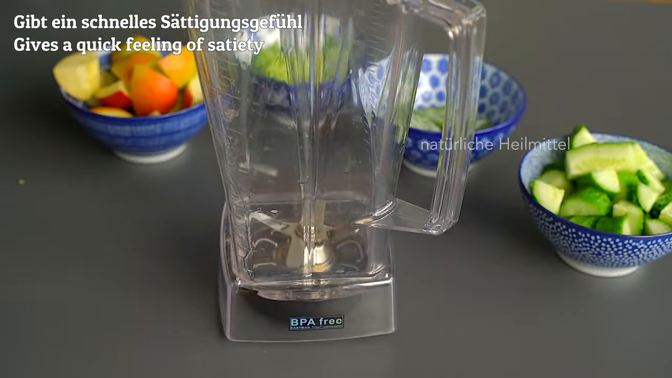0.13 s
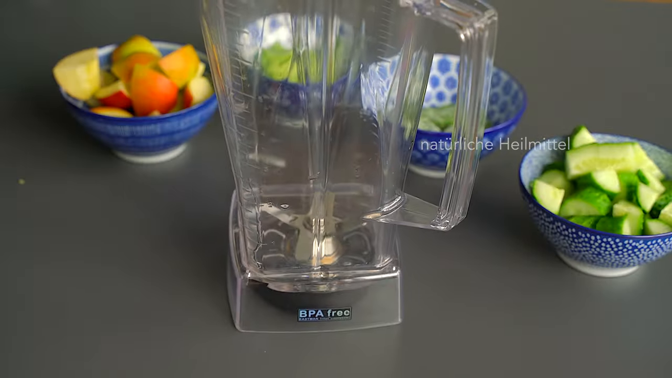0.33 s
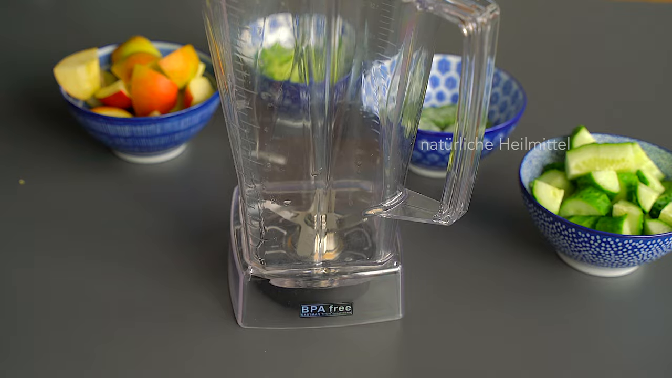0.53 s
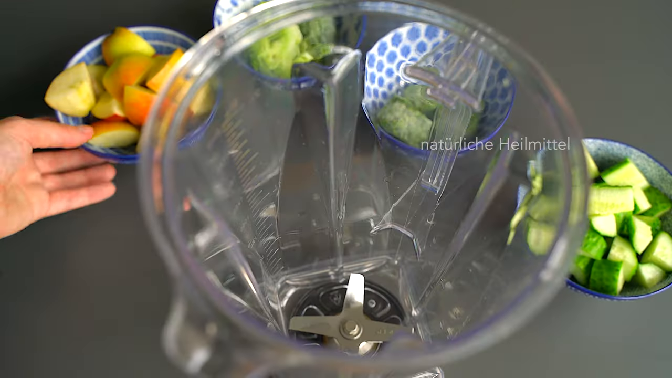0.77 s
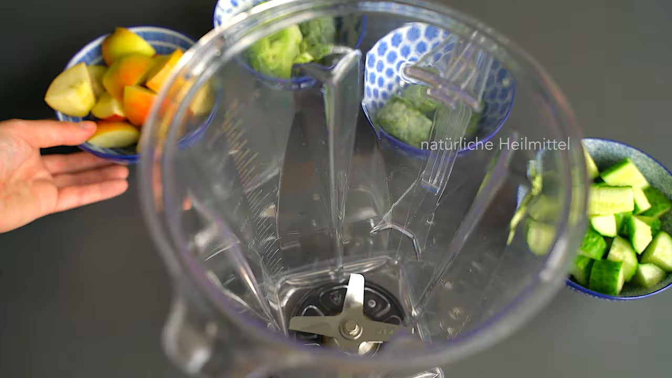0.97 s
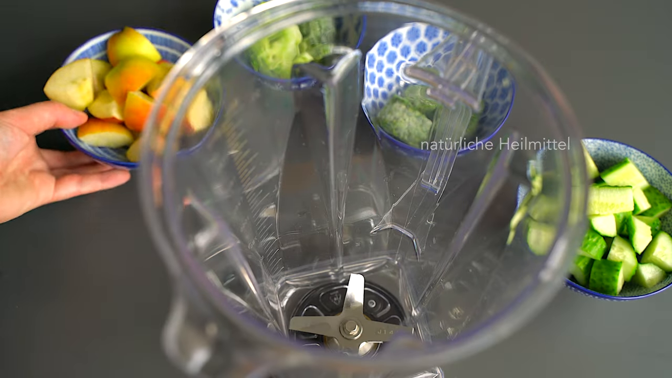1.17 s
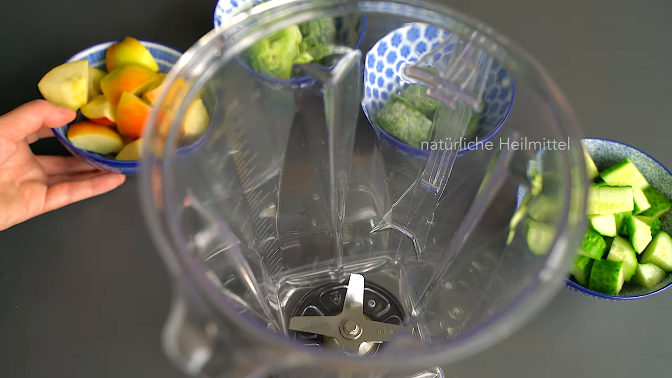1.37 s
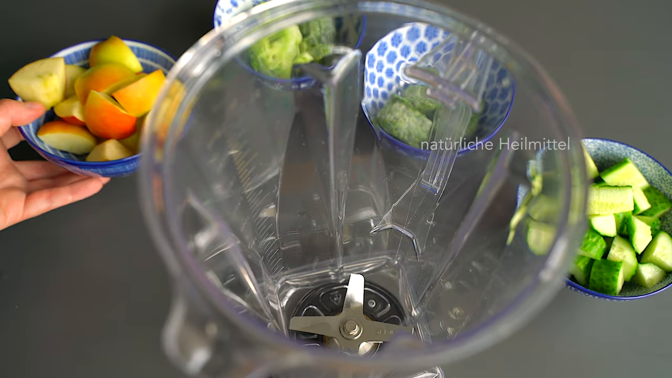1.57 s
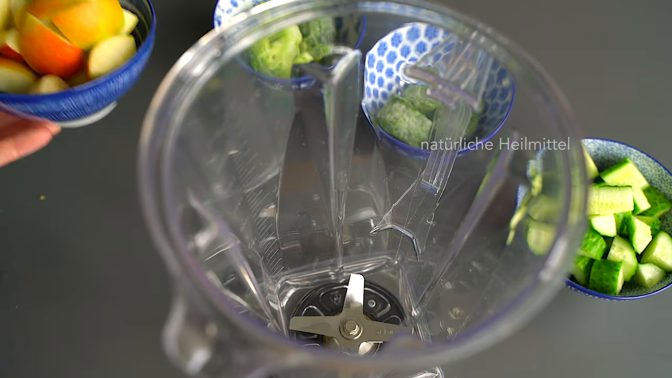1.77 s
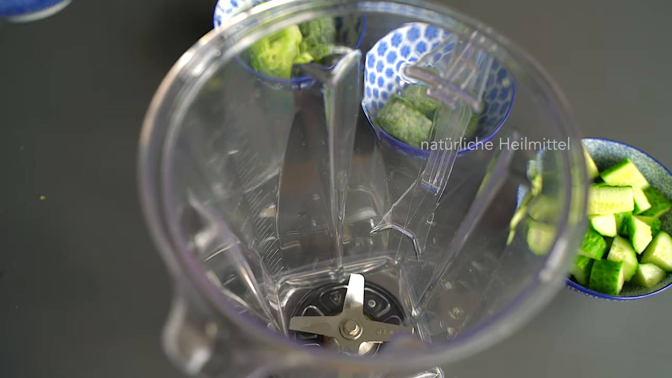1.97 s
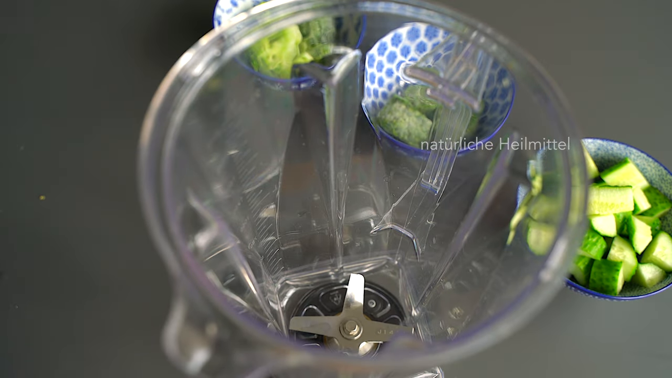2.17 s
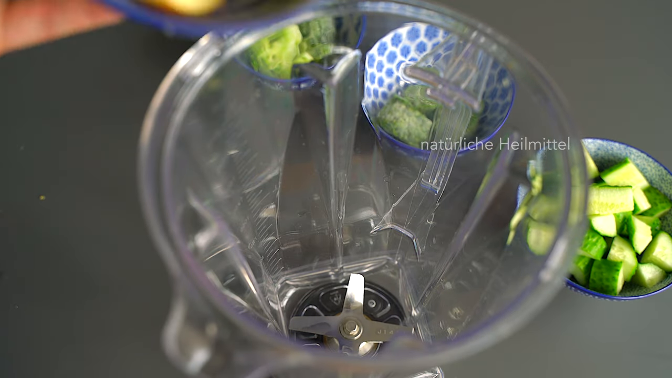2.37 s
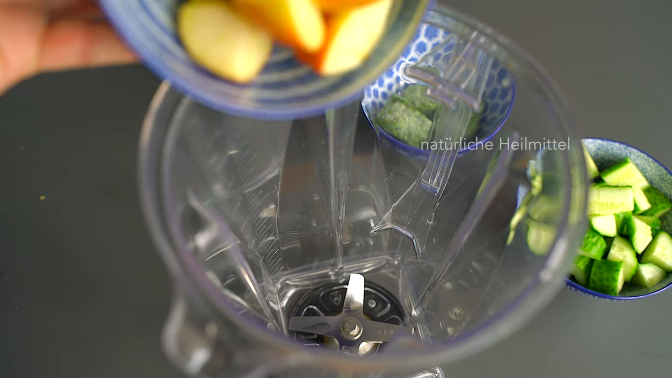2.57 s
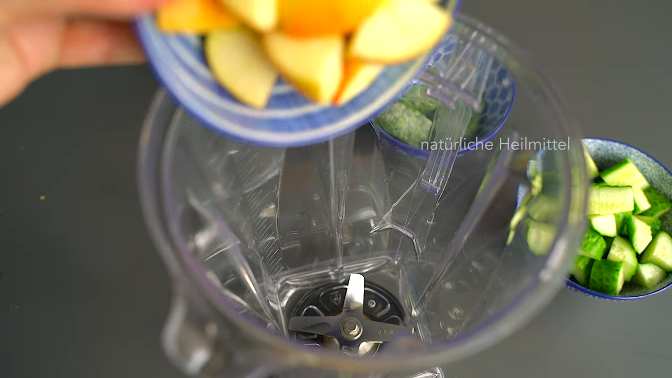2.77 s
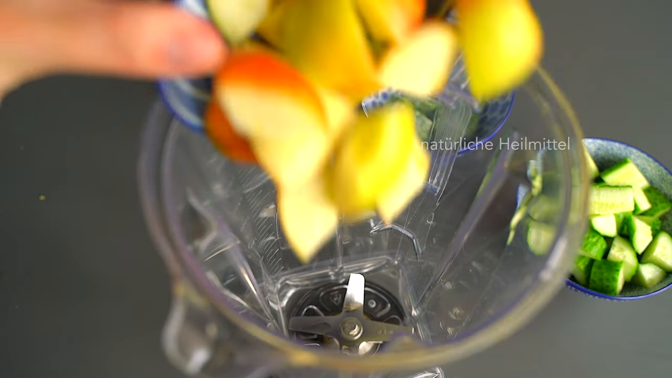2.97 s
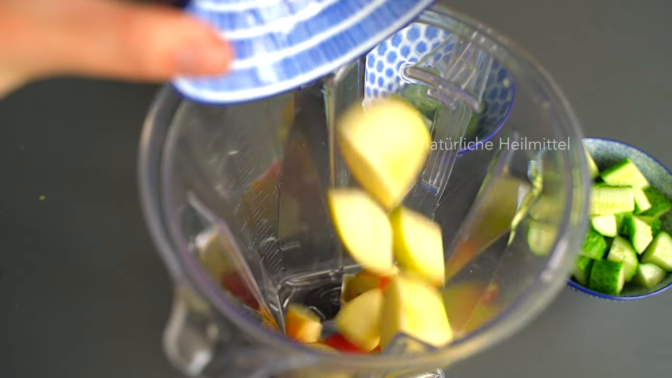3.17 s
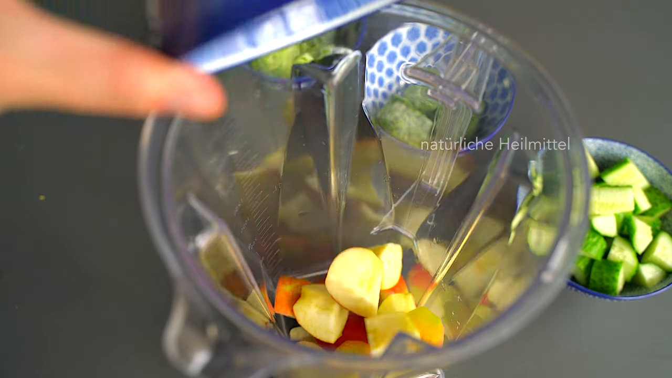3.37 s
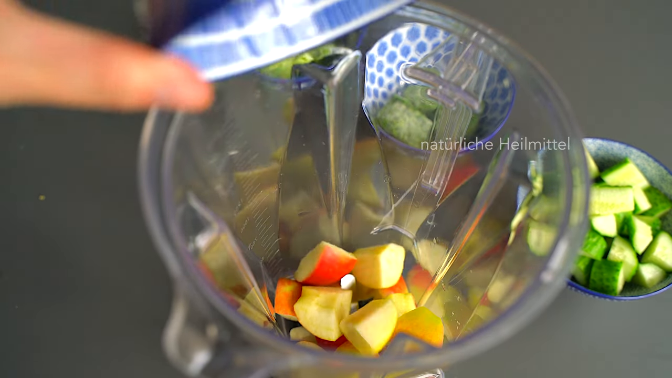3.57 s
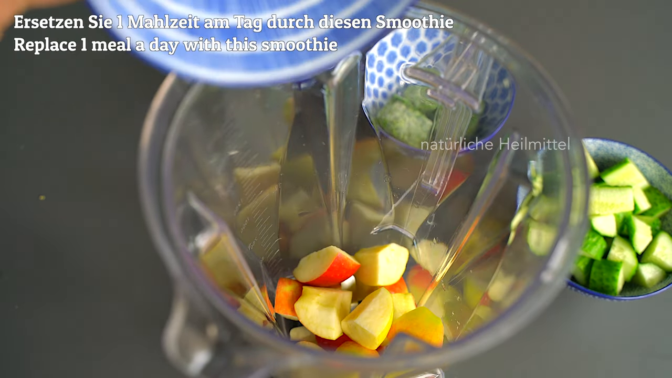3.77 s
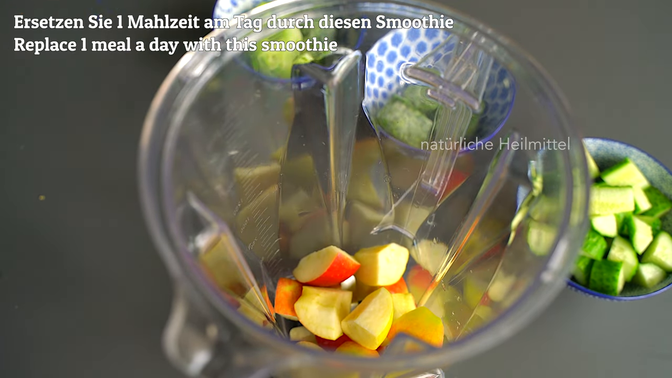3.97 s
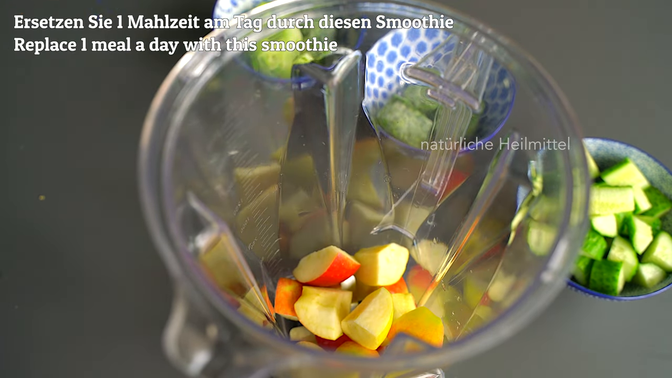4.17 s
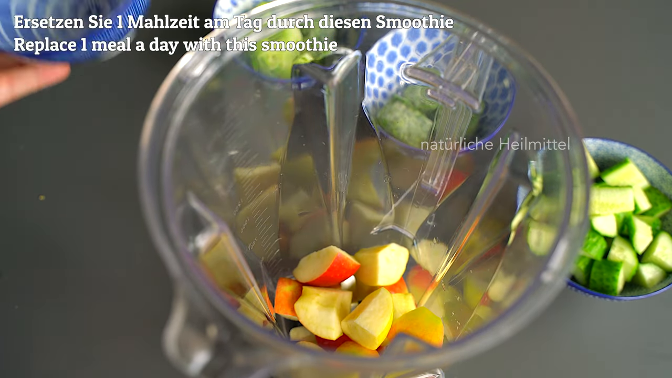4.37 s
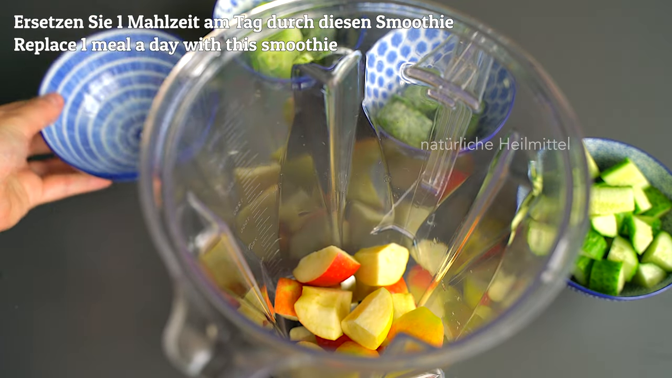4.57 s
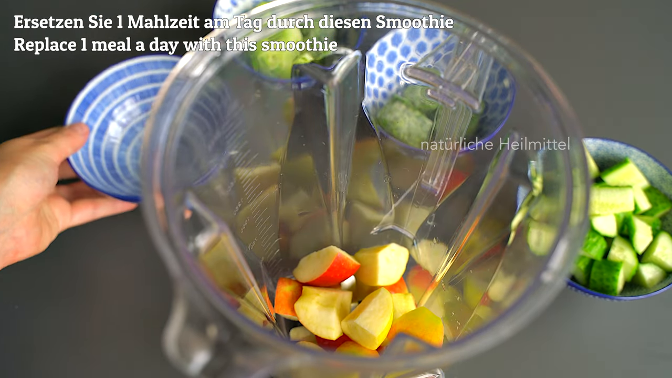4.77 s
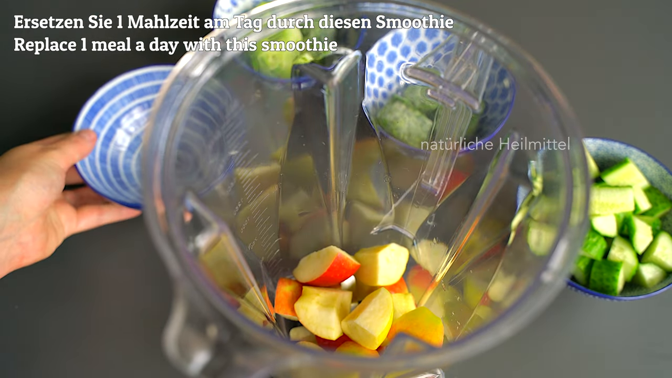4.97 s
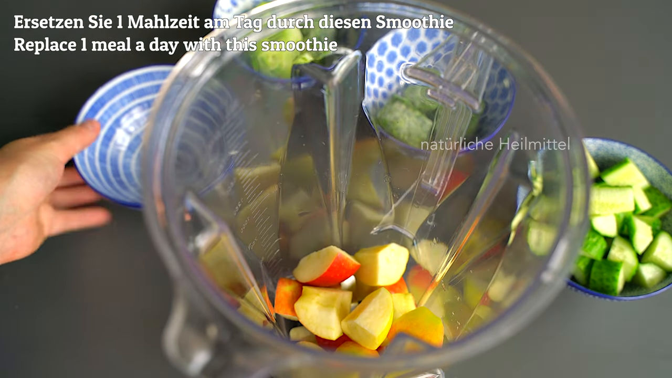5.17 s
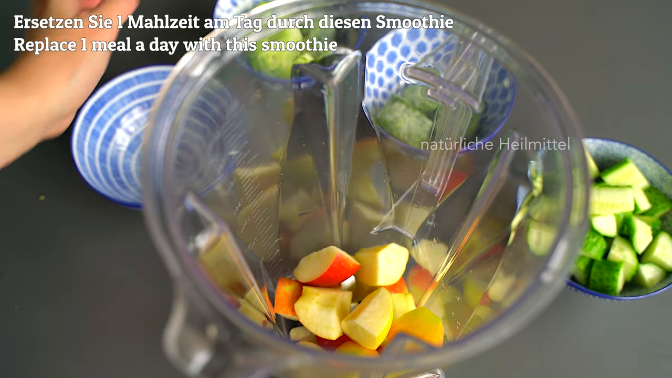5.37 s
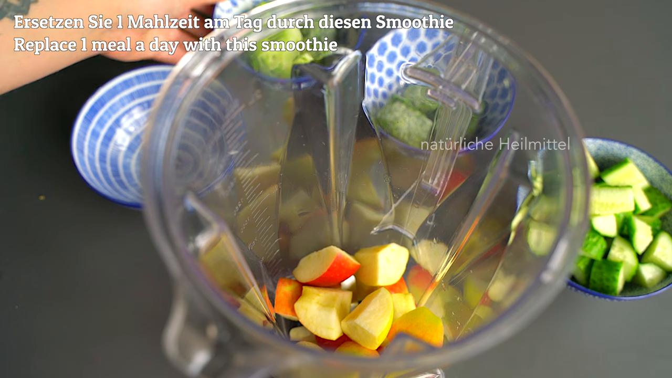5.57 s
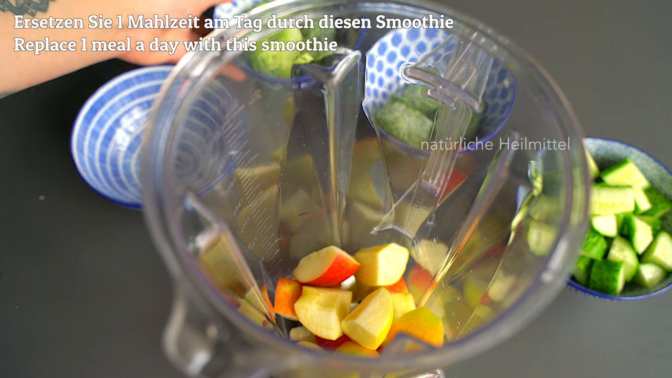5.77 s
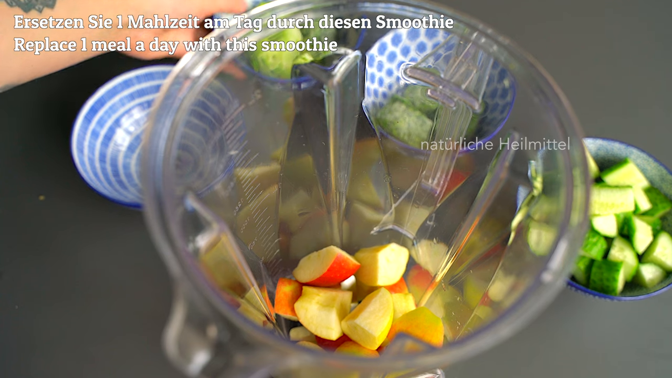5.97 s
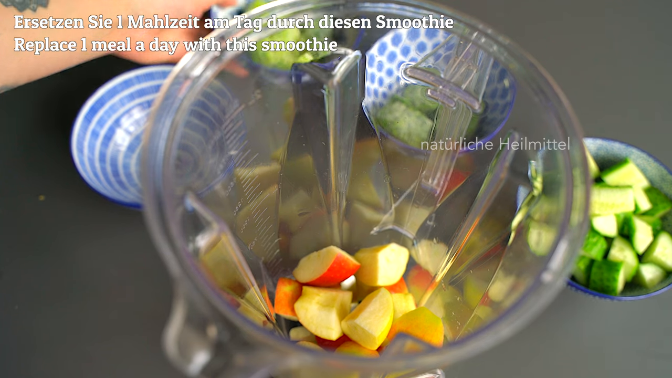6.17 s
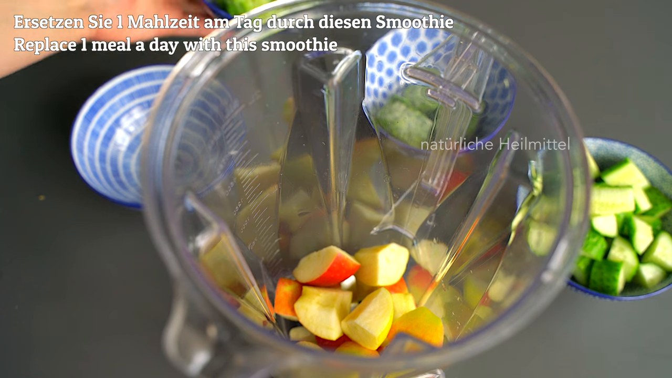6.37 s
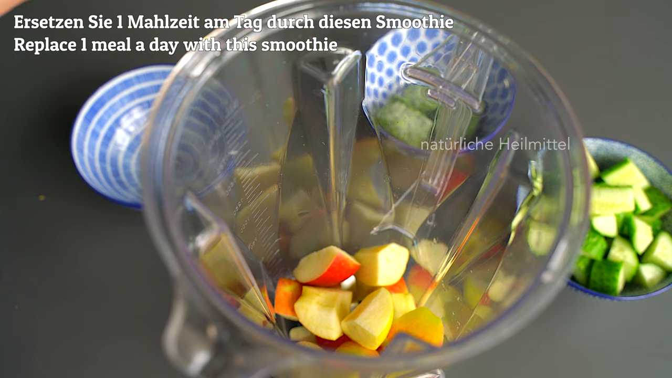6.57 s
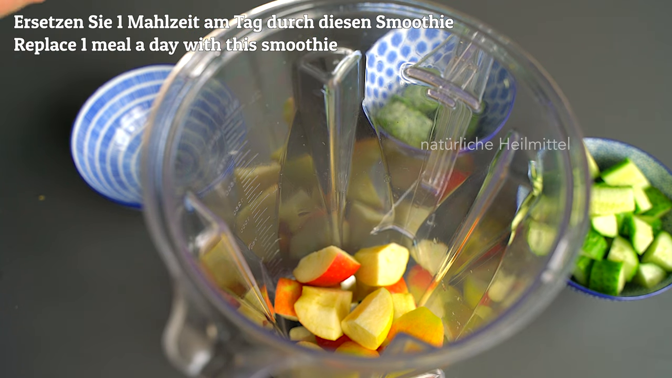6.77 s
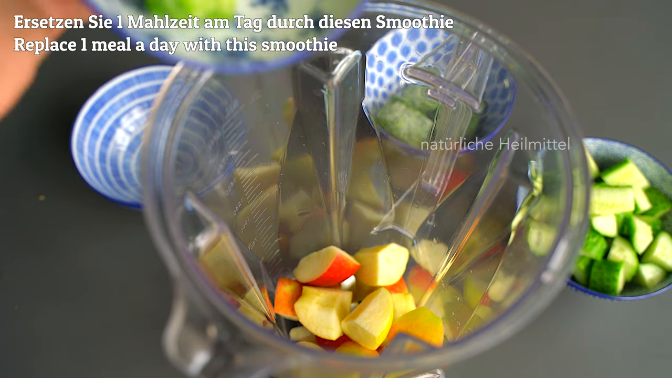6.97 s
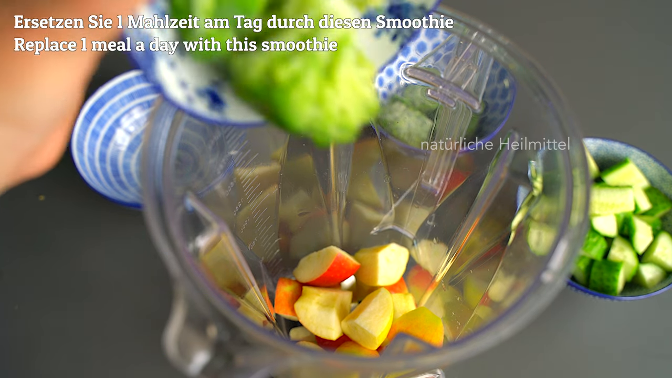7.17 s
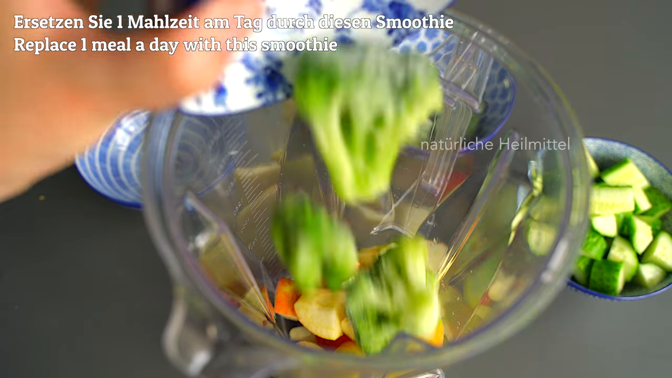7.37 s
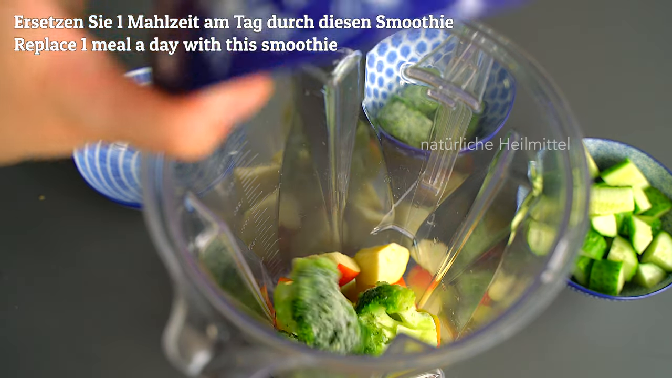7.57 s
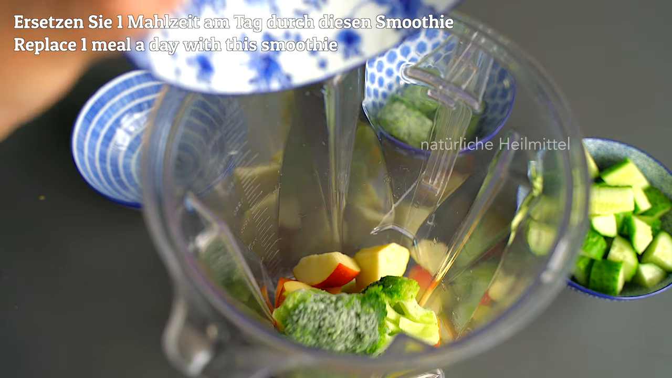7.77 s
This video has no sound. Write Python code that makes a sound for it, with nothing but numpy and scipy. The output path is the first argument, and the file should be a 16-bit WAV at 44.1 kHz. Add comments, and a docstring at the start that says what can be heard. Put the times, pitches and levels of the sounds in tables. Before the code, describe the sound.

A plastic blender jar is set down, then apple pieces and florets thud wetly into it, with a china bowl clattering down in between.

```python
"""A kitchen table: a plastic blender jar is set down and nudged into place with stick-slip friction.
A china bowl of apple pieces is tipped in; they land with wet smacks and excite the resonances of the
jar's air column and walls. The empty bowl clatters back onto the table. A second bowl is picked up;
hard green florets skid over its glaze, ring its modes with a clink and drop onto the fruit.
The kitchen adds a short reverberation and a faint, low background noise."""
import sys
import numpy as np
from scipy import signal
from scipy.fft import rfft, irfft, next_fast_len
from scipy.io import wavfile
from scipy.ndimage import uniform_filter1d

SR = 44100
rng = np.random.default_rng(int(sys.argv[2]) if len(sys.argv) > 2 else 0)


def int16_out(signal):
    """Quantize to a 16-bit WAV file."""
    q = np.round(np.clip(np.atleast_2d(signal).T, -1, 1) * 32767)
    wavfile.write(sys.argv[1], SR, q.astype(np.int16))


N = 345744
TIME = np.arange(N) / SR
AGE = TIME[:SR * 3 // 4]   # time since an impact [s]
RELEASE_S = 5.215   # the fingers let go of the empty apple bowl

# florets striking their china bowl: (time [s], level [dB])
FLORET_STRIKES = [(7.215, -30), (7.2935, -23), (7.317, -34), (7.423, -28), (7.4438, -7)]
# modes of that bowl, damped by the hand: (frequency [Hz], level [dB], t60 [s])
FLORET_BOWL_MODES = [(1661, -5.5, 0.2), (3434, -4.5, 0.062), (5090, -6, 0.025), (5720, 5.5, 0.022),
                     (8360, 2, 0.031), (11460, -8, 0.024), (14900, -1, 0.02)]
# treble noise of tearing flesh and of ticks on glaze: (frequency [Hz], spectral level [dB])
FIZZ_SPECTRUM = [(3500, 2), (7000, 2.5), (11000, 0.5), (16000, -7.5)]


def from_db(db):
    """Amplitude ratio of a level in decibels."""
    return 10 ** (np.asarray(db) / 20)


def rms_one(x):
    """Normalise to unit rms."""
    return x / np.sqrt(np.mean(x ** 2) + 1e-20)


def at_hz(points, hz):
    """Interpolate a table on a logarithmic frequency axis."""
    f, value = np.transpose(points)
    return np.interp(np.log(np.maximum(hz, 1)), np.log(f), value)


def fade(t60):
    """Damping: an exponential decay of 60 dB in t60 seconds."""
    return np.exp(-np.log(1000) * AGE / t60)


def swell(contact_s):
    """Finite contact time: the softer the object, the slower the onset."""
    return 1 - np.exp(-(AGE / contact_s) ** 2)


def add(out, s, sound):
    """Superposition: mix a sound in at s seconds."""
    i = round(s * SR)
    out[i:i + len(sound)] += sound[:N - i]


def coloured(x, spectrum):
    """Spectral shaping of a steady noise; unit rms."""
    size = next_fast_len(len(x))
    gain = from_db(at_hz(spectrum, np.fft.rfftfreq(size, 1 / SR)))
    return rms_one(irfft(rfft(x, size) * gain, size)[:len(x)])


def flutter(size, window):
    """Slow random fluctuation: noise averaged over a window of samples; unit rms."""
    return rms_one(uniform_filter1d(rng.standard_normal(size), size=window))


def through(x, response):
    """Linear filtering: convolution with an impulse response scaled to unit energy."""
    return signal.fftconvolve(x, response / np.sqrt(np.sum(response ** 2)))[:N]


def burst(spectrum, t60, contact_s):
    """Modal overlap: modes too dense to tell apart decay as a puff of noise."""
    size = SR // 6
    return coloured(rng.standard_normal(size), spectrum) * (fade(t60) * swell(contact_s))[:size]


def ring(modes, contact_s, either_sign=False):
    """Free vibration: damped modes, each with a strength set by the contact point; unit peak."""
    signs = rng.choice([-1, 1], len(modes)) if either_sign else 1   # starting inward or outward
    strengths = from_db(2 * rng.standard_normal(len(modes))) * signs
    tones = sum(strength * from_db(db) * np.sin(2 * np.pi * hz * AGE) * fade(t60)
                for strength, (hz, db, t60) in zip(strengths, modes))
    vibration = tones * swell(contact_s)
    return vibration / np.abs(vibration).max()


def table_knocks(knocks, modes, contact_s, boom_db, click_db, click_t60):
    """Impact excitation: a hard foot on the table gives a clack, a click and the board's low boom."""
    # table top: (frequency [Hz], level [dB], t60 [s])
    board_modes = [(48, -6, .25), (84.4, -13, 0.48), (127, 0, 0.41), (141, -11.5, 0.66), (174.8, 1, 0.21),
                   (239, -3, 0.14)]
    # contact click: (frequency [Hz], spectral level [dB])
    click_spectrum = [(1000, -39), (2000, 2.5), (3000, 7), (6000, -11.5), (9000, -31), (15000, -36)]
    out = np.zeros(N)
    for s, db in knocks:
        add(out, s, from_db(db) * ring(modes, contact_s))
        # boom and click follow only a share of the knock's level
        add(out, s, from_db(boom_db + 0.3 * db) * ring(board_modes, contact_s=0.004, either_sign=True))
        add(out, s, from_db(click_db + 0.56 * db) * burst(click_spectrum, click_t60, contact_s))
    return out


def jar_knocks():
    """The jar is set down: its heavily damped plastic foot makes each impact a short clack."""
    # foot meeting the table: (time [s], level [dB])
    knocks = [(0.114, -5), (0.422, -17.5), (0.474, -27)]
    # plastic foot: (frequency [Hz], level [dB], t60 [s])
    foot_modes = [(372, -0.5, 0.022), (730, -1.5, 0.032), (1070, 5, 0.0085), (1352, 16, 0.0042)]
    return table_knocks(knocks, foot_modes, contact_s=0.00081, boom_db=-19, click_db=-15.5, click_t60=0.02)


def micro_slips(per_s, spread_db, clump_db):
    """Friction as shot noise: tiny random slips of uneven size, bunched into flurries; unit rms."""
    sizes = from_db(spread_db * np.minimum(rng.exponential(1, N), 4)) * rng.choice([-1, 1], N)
    flurries = from_db(clump_db * flutter(N, window=500))
    return rms_one(sizes * flurries * (rng.random(N) < per_s / SR))


def strokes(rows, texture):
    """Friction noise swells and sinks with speed in each (time [s], length [s], level [dB]) stroke."""
    out = np.zeros(N)
    for s, length, db in rows:
        stroke = rms_one(texture[int(s * SR):int((s + length) * SR)])
        add(out, s, from_db(db) * stroke * np.sqrt(np.hanning(len(stroke))))
    return out


def drags(friction_db, ringing_db, rumble_db):
    """Sliding friction: the slips of a dragged foot ring the vessel, and the board rumbles."""
    # jar, then a bowl, dragged: (time [s], length [s], friction level [dB], rumble level [dB])
    moves = [(0.258, 0.11, -29, -47), (0.363, 0.05, -26, -40.5), (0.41, 0.11, -29.5, -48),
             (0.663, 0.14, -42.5, -57), (1.085, 0.11, -28, -59), (1.169, 0.19, -26.5, -50.5),
             (1.383, 0.093, -27.5, -43), (6.179, 0.027, -32, -58)]
    # rubbing foot and rumbling board: (frequency [Hz], spectral level [dB])
    friction_spectrum = [(150, -43), (250, 2.5), (308, -11), (484, 2), (538, -1), (686, -1), (802, -2),
                         (906, -4), (1010, -2.5), (3770, -21), (4260, -19.5), (4650, -20.5), (5070, -25),
                         (16000, -49.5)]
    rumble_spectrum = [(40, -1.5), (135, 15), (260, 10), (450, -32)]
    # dragged vessel: (frequency [Hz], level [dB], t60 [s])
    vessel_modes = [(745, 5.5, 0.058), (940, 9, 0.062), (1536, -8, 0.086), (3820, -2, 0.027),
                    (4830, -10, 0.039), (6760, -20, 0.012), (14250, -24, 0.04)]
    rubs = [(s, length, db) for s, length, db, _ in moves]
    rumbles = [(s, length, db) for s, length, _, db in moves]
    slips = micro_slips(per_s=2000, spread_db=2.5, clump_db=1.5)
    friction = strokes(rubs, coloured(slips, friction_spectrum))
    ringing = strokes(rubs, through(slips, ring(vessel_modes, contact_s=0.00025)))
    rumble = strokes(rumbles, coloured(rng.standard_normal(N), rumble_spectrum))
    return from_db(friction_db) * friction + from_db(ringing_db) * ringing + from_db(rumble_db) * rumble


def squeaks(level_db, skirt_db_per_octave, jitter, bowl_db):
    """Stick-slip oscillation: slips that fall into step make a brief, unsteady harmonic tone."""
    # feet squeaking on the table:
    # (time [s], length [s], first pitch [Hz], last pitch [Hz], formant [Hz], level [dB])
    glides = [(0.261, 0.079, 2413, 2150, 2300, -40), (5.797, 0.026, 543, 453, 500, -36),
              (5.848, 0.017, 687, 739, 1570, -40.5), (6.454, 0.029, 1390, 1010, 2350, -54.5)]
    out = np.zeros(N)
    for s, length, first_hz, last_hz, formant_hz, db in glides:
        size = int(length * SR)
        waver = 1 + jitter * flutter(len(AGE), window=100)[:size]
        phase = 2 * np.pi * np.cumsum(np.linspace(first_hz, last_hz, size) * waver) / SR
        tone = sum(np.sin(k * phase) * from_db(-skirt_db_per_octave * abs(np.log2(k * first_hz / formant_hz)))
                   for k in range(1, 8))
        add(out, s, from_db(db + level_db) * rms_one(tone) * np.hanning(size))
    # the later squeaks drive the second bowl's modes as it is picked up
    bowl = through(out * (TIME > RELEASE_S), ring(FLORET_BOWL_MODES, contact_s=0.00039))
    return out + from_db(bowl_db) * bowl


def sliding(slides):
    """Power law: the rustle's amplitude follows a speed that rises evenly and then runs out."""
    return sum(from_db(db) * np.interp(TIME, [start, fastest, end], [0, 1, 0]) ** 1.71
               for start, fastest, end, db in slides)


def food_slides(apple_db, floret_db, singing_db):
    """Friction and forced vibration: pieces rustle over the glaze; hard florets make their bowl sing."""
    # apple sliding down its bowl; florets skidding along theirs, then crumbling in the jar:
    # (start [s], fastest moment [s], end [s], level when fastest [dB])
    apple_slides = [(2.54, 2.61, 2.85, -45.5), (2.87, 3.02, 3.18, -37.5), (3.1, 3.23, 3.547, -27.5),
                    (3.59, 3.635, 3.71, -43)]
    floret_slides = [(7.03, 7.295, 7.375, -38.5), (7.45, 7.5, 7.66, -30)]
    # rustle of sliding food: (frequency [Hz], spectral level [dB])
    rustle = [(700, -8), (1380, 1.5), (1900, 1), (3300, 3.5), (4500, -2.5), (5600, -2), (8000, -7.5),
              (16000, -13.5)]
    apple_slips = micro_slips(per_s=2600, spread_db=2.5, clump_db=4.0)
    floret_slips = micro_slips(per_s=3900, spread_db=5.0, clump_db=1.5)
    apple = sliding(apple_slides) * coloured(apple_slips, rustle)
    florets = sliding(floret_slides) * coloured(floret_slips, rustle)
    touching = (TIME > FLORET_STRIKES[0][0]) & (TIME < FLORET_STRIKES[-1][0])
    singing = through(florets * touching, ring(FLORET_BOWL_MODES, contact_s=0.0018))
    return from_db(apple_db) * apple + from_db(floret_db) * (florets + from_db(singing_db) * singing)


def crackle(rough_db):
    """Random amplitude modulation: cell walls burst unevenly along a tear; unit rms."""
    return rms_one(from_db(rough_db * flutter(SR // 6, window=60)))


def smacks(contacts, smack_db, smack_t60, fizz_db, fizz_t60):
    """Noise transients: moist flesh slaps and tears at each (time [s], level [dB]) contact."""
    # wet slap: (frequency [Hz], spectral level [dB])
    slap_spectrum = [(900, 6), (1800, -12.5), (3300, 5.5), (5200, 2.5), (7000, -58), (12000, -88)]
    out = np.zeros(N)
    for s, db in contacts:
        slap = burst(slap_spectrum, smack_t60, contact_s=0.0011) * crackle(rough_db=3.5)
        fizz = burst(FIZZ_SPECTRUM, fizz_t60, contact_s=0.0011) * crackle(rough_db=5.5)
        add(out, s, from_db(db + smack_db) * slap + from_db(db + fizz_db) * fizz)
    return out


def tears():
    """Adhesion and fracture: cut faces part, florets crunch and damp fingers leave the glaze."""
    # surfaces parting: (time [s], level [dB])
    partings = [(2.593, -42.5), (2.6393, -41), (2.9755, -45.5), (3.0625, -32.5), (3.1544, -24.5),
                (3.1689, -21), (3.196, -23.5), (3.3323, -22), (5.251, -44.5), (6.1635, -45.5),
                (6.7059, -47), (6.9092, -48.5), (7.4644, -18.5), (7.4893, -14.5), (7.5614, -20),
                (7.739, -37)]
    return smacks(partings, smack_db=2.5, smack_t60=0.053, fizz_db=5, fizz_t60=0.033)


def jar_impacts(landings, air_db, wall_db, flesh_db, sway_db):
    """Cavity and wall resonance: each piece thuds, rings the jar's air and walls, and sways the jar."""
    # air column, lower while falling pieces block the mouth, higher and duller as the jar fills:
    # (time [s], frequency [Hz], t60 [s])
    air_column = [(2.7, 350, 0.37), (3.16, 339.4, 0.15), (3.35, 375, 0.13), (7.7, 377.2, 0.12)]
    # plastic walls, and the whole jar swaying on the table: (frequency [Hz], level [dB], t60 [s])
    wall_modes = [(466.5, -1.5, 0.22), (564, 0.5, 0.12), (681, -6.5, 0.14), (764, -8, 0.24),
                  (883.6, -2, 0.24), (924.5, 2.5, 0.079), (1020, 8.5, 0.04), (1150, -2, 0.082),
                  (1208, -7, 0.11), (1207, -8.5, 0.013), (1486, -35, 0.11), (1660, -10, 0.064),
                  (1977, -7.5, 0.023), (2214, -12.5, 0.014), (2620, -4.5, 0.04)]
    sway_modes = [(32.7, -4, 0.5), (39.7, -6, 0.3), (65, -10.5, 0.78), (122.6, -11.5, 0.43),
                  (168, -15, 0.37)]
    # thud of the flesh: (frequency [Hz], spectral level [dB])
    flesh_spectrum = [(220, -27.5), (380, 16), (600, 10.5), (1000, -2.5), (1400, -9.5), (2500, -9.5),
                      (5000, -61)]
    out = np.zeros(N)
    moments, pitches, decays = np.transpose(air_column)
    for s, weight, hardness in landings:
        # the mouth is blocked differently at each blow
        air_hz = np.interp(s, moments, pitches) * (1 + rng.uniform(-.045, .045))
        air = np.sin(2 * np.pi * air_hz * AGE) * fade(np.interp(s, moments, decays))
        # a harder landing starts the air more abruptly and rings the walls more
        onset = swell(0.00051 * 2 ** (-hardness / 14))
        blow_db = weight + 0.39 * hardness
        shove_db = 0.44 * (weight + hardness)
        add(out, s, from_db(weight + air_db) * air * onset)
        add(out, s, from_db(blow_db + wall_db) * ring(wall_modes, contact_s=0.00061, either_sign=True))
        add(out, s, from_db(blow_db + flesh_db) * burst(flesh_spectrum, t60=0.066, contact_s=0.00065))
        add(out, s, from_db(shove_db + sway_db) * ring(sway_modes, contact_s=0.014, either_sign=True))
    return out


def falling_food():
    """Inelastic impacts: apple pieces, later florets, land in the jar, each with a brief wet smack."""
    # single landings that stand out, hard on the wall and soft on fruit:
    # (time [s], weight [dB], hardness [dB])
    distinct_landings = [(2.677, -19, 7), (3.024, -15, 10.5), (3.077, -8, 0.5), (3.126, -1.5, -46),
                         (3.155, -1.5, -6.5), (3.174, 0, -3), (3.198, -2.5, 5), (3.28, -8, 12),
                         (3.319, -4.5, -14), (3.332, -4, -14), (3.419, -8.5, 1), (3.606, -16, -7.5),
                         (7.465, -25, 25), (7.482, -7.5, 11.5), (7.544, -10, 21), (7.605, -11, 6),
                         (7.635, -22, 15.5), (7.695, -3, -0.5)]
    landings = distinct_landings + tumbling(gap_s=0.018, settling_db_per_s=39, spread_db=2.5)
    thuds = jar_impacts(landings, air_db=-2.5, wall_db=-5, flesh_db=-8.0, sway_db=-24.5)
    contacts = [(s, weight + hardness) for s, weight, hardness in landings]
    return thuds + smacks(contacts, smack_db=-13.5, smack_t60=0.015, fizz_db=-20, fizz_t60=0.013)


def tumbling(gap_s, settling_db_per_s, spread_db, count=24):
    """Granular settling: a quick, uneven patter of further pieces weakens as the heap comes to rest."""
    # the rest of each bowlful: (time [s], length [s], weight [dB], hardness [dB])
    pours = [(3.205, 0.185, -3.5, 2), (7.491, 0.08, -9, -10)]
    landings = []
    for s, length, weight, hardness in pours:
        delays = gap_s * (np.arange(count) + rng.random(count))
        scatter = spread_db * rng.standard_normal((count, 2))
        landings += [(s + t, weight - settling_db_per_s * t + heavier, hardness + harder)
                     for t, (heavier, harder) in zip(delays, scatter) if t < length]
    return landings


def bowl_knocks(chatter_s, chatter_db, touches):
    """Impact and rocking: china knocks on the table; the empty bowl chatters on its foot ring."""
    # bowls meeting the table: (time [s], level [dB])
    knocks = [(4.9374, 10), (5.0068, -1), (5.0682, -2.5), (6.164, -25.5)]
    # clack of china on the board: (frequency [Hz], level [dB], t60 [s])
    clack_modes = [(400, -21, 0.15), (670, -5.5, 0.022), (840, 21, 0.005), (1140, -1, 0.014),
                   (1450, -11, 0.016)]
    # a quick run of touches swells and dies just after the first landing
    progress = (np.arange(touches) + rng.uniform(.1, .9, touches)) / touches
    times = knocks[0][0] + 0.008 + chatter_s * progress
    levels = chatter_db + 10 * np.log10(np.sin(np.pi * progress))
    return table_knocks(knocks + list(zip(times, levels)), clack_modes,
                        contact_s=0.00039, boom_db=-38.5, click_db=-19.5, click_t60=0.011)


def china_clinks(clink_db, tick_db):
    """Modal damping: the free bowl pings long on release; florets clink briefly on the hand-held one."""
    # empty apple bowl, ringing freely: (frequency [Hz], level [dB], t60 [s])
    free_modes = [(3262, 7, 0.88), (5480, 2, 0.38), (8200, -21, .12)]
    out = np.zeros(N)
    for s, db in FLORET_STRIKES:
        add(out, s, from_db(db + clink_db) * ring(FLORET_BOWL_MODES, contact_s=0.0019, either_sign=True))
        add(out, s, from_db(db + tick_db) * burst(FIZZ_SPECTRUM, t60=0.048, contact_s=0.0005))
    add(out, RELEASE_S, from_db(-51) * ring(free_modes, contact_s=0.0053))
    return out


def reverberation(x, build_s):
    """Diffuse field: octave bands of noise build up quickly and decay each at its own rate."""
    # colour of the kitchen's reflections: (frequency [Hz], level [dB])
    colour = [(100, -4.5), (400, 0.5), (900, -5.5), (2000, -4.5), (4500, -2), (9000, -8), (15000, -0.5)]
    # reverberation time: (frequency [Hz], t60 [s])
    decay_times = [(100, 0.63), (400, 0.45), (1500, 0.59), (4500, 0.49), (12000, 0.3)]
    tail = 0
    for hz in 44 * 2. ** np.arange(9):
        bandpass = signal.butter(2, [hz, 2 * hz * .95], "band", fs=SR, output="sos")
        band = signal.sosfilt(bandpass, rng.standard_normal(len(AGE)))
        centre = hz * np.sqrt(2)
        tail = tail + band * from_db(at_hz(colour, centre)) * fade(at_hz(decay_times, centre))
    return through(x, tail * (1 - np.exp(-AGE / build_s)))


def room_tone(level_db):
    """Stationary background noise, strongest in the bass."""
    # the quiet kitchen: (frequency [Hz], spectral level [dB])
    spectrum = [(12, -4), (25, -1), (38, 3), (55, -6.5), (100, -11.5), (200, -4.5), (400, -13.5),
                (850, -15.5), (1500, -24.5), (2400, -30.5), (4000, -33), (8000, -38.5), (16000, -39)]
    return from_db(level_db) * coloured(rng.standard_normal(N), spectrum)


def scene():
    """Direct-to-reverberant ratio: the microphone faces into the jar, so food is close, the table roomy."""
    knocks = jar_knocks() + bowl_knocks(chatter_s=0.055, chatter_db=-5, touches=14)
    rubbing = drags(friction_db=-6.0, ringing_db=-12.5, rumble_db=3.0)
    rubbing += squeaks(level_db=1.5, skirt_db_per_octave=12.5, jitter=0.058, bowl_db=-2)
    food = china_clinks(clink_db=-1.5, tick_db=-17.5)
    food += food_slides(apple_db=-2.0, floret_db=-4, singing_db=-3)
    food += tears() + falling_food()
    to_room = from_db(-5) * knocks + from_db(-6) * rubbing + from_db(-12) * food
    room = room_tone(level_db=-52) + reverberation(to_room, build_s=0.0019)
    return (knocks + rubbing + food + room)[None]


def record(dry):
    """Saturation rounds off the loudest peaks; a steep low-pass filter cuts the top."""
    ceiling, cutoff_hz = 0.92, 16100
    rounded = dry / (1 + (dry / ceiling) ** 6) ** (1 / 6)
    return signal.sosfilt(signal.ellip(10, .2, 80, cutoff_hz, fs=SR, output="sos"), rounded)


dry = scene()
out = record(dry)
int16_out(out)
```